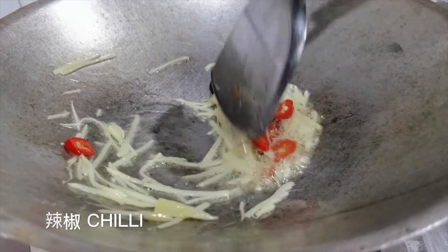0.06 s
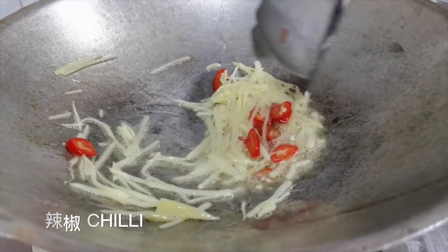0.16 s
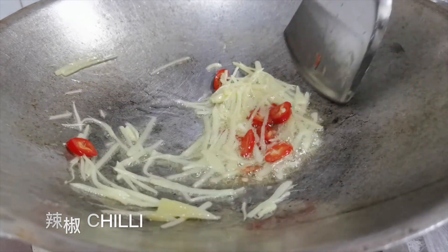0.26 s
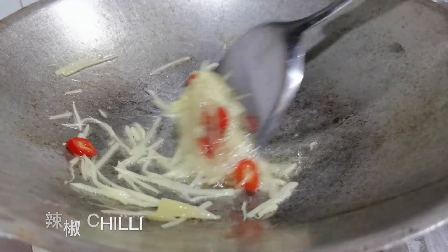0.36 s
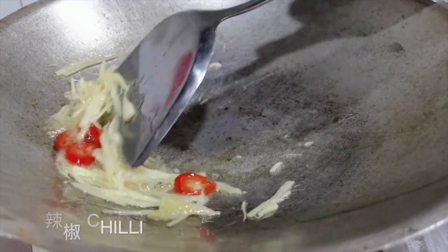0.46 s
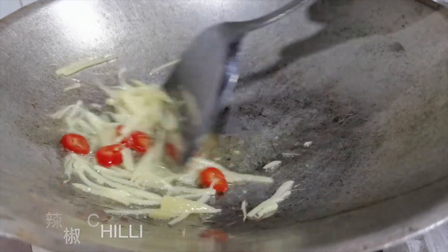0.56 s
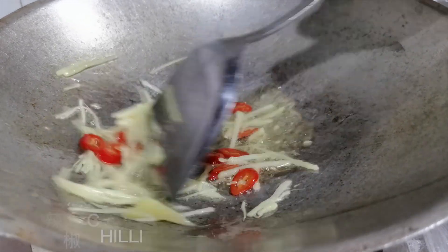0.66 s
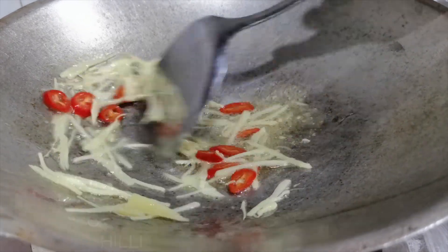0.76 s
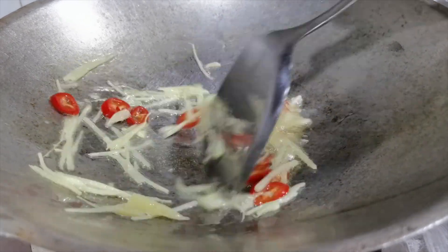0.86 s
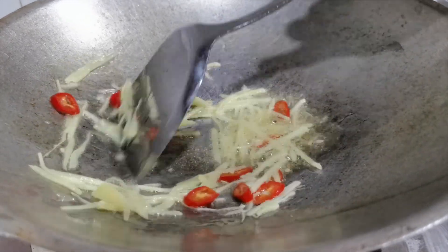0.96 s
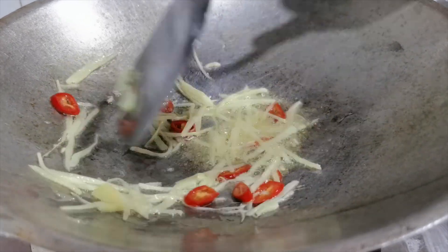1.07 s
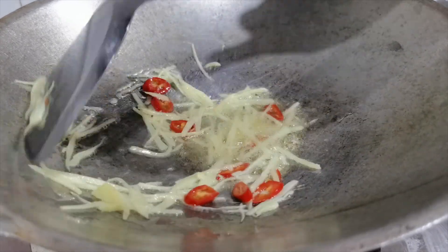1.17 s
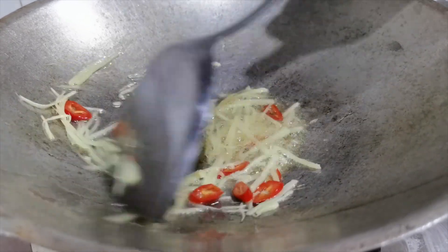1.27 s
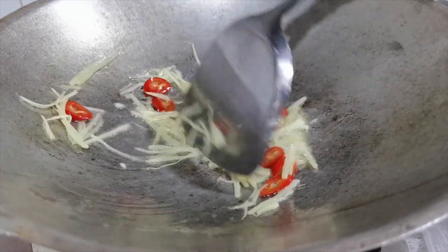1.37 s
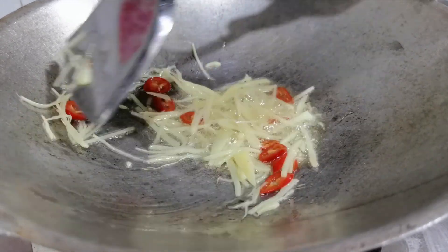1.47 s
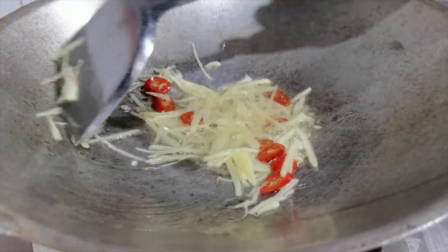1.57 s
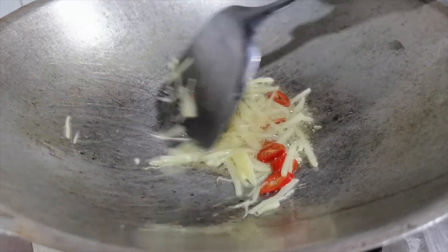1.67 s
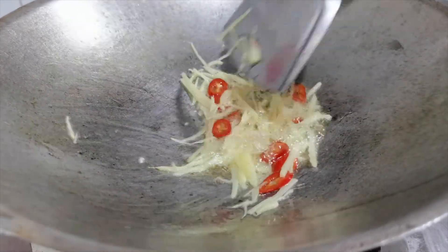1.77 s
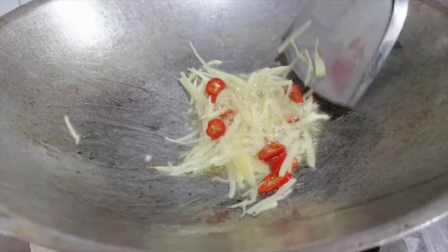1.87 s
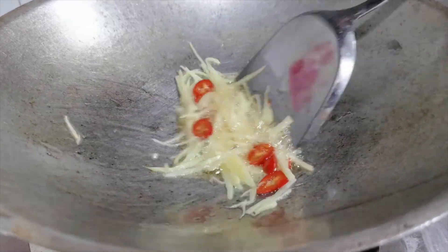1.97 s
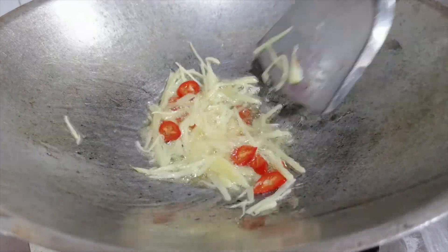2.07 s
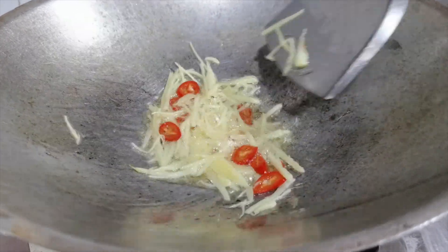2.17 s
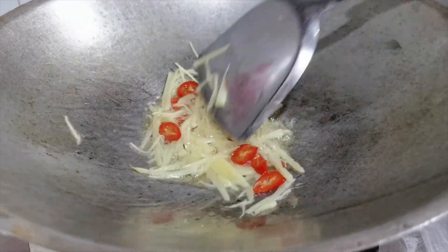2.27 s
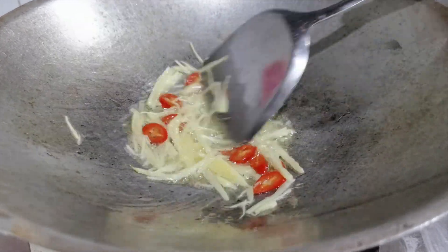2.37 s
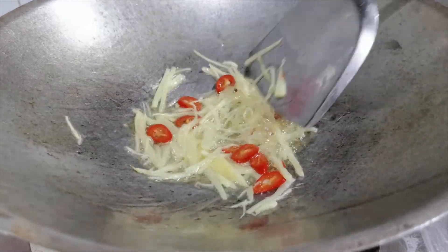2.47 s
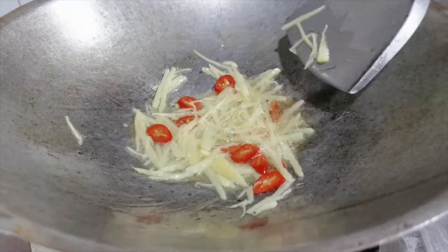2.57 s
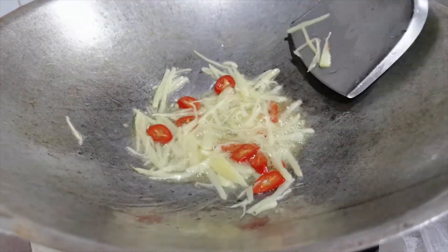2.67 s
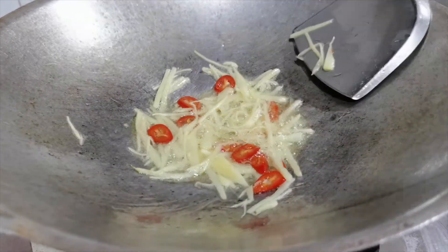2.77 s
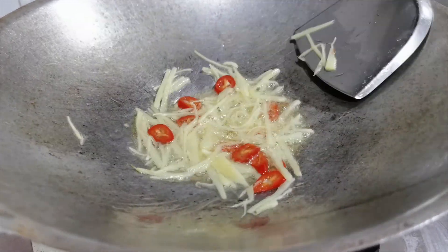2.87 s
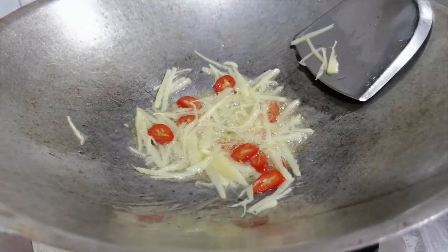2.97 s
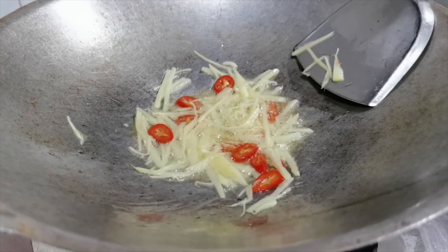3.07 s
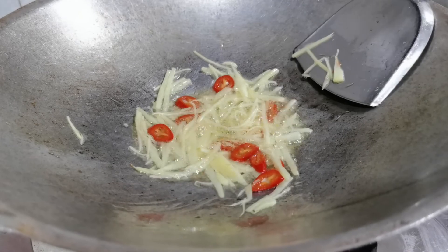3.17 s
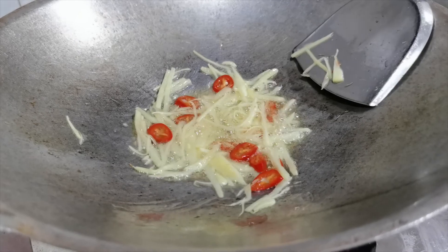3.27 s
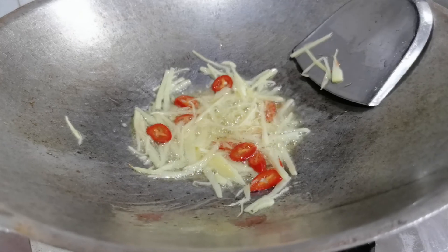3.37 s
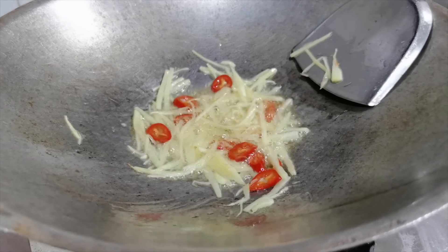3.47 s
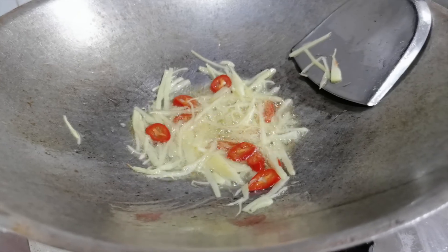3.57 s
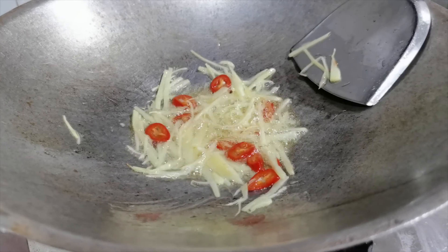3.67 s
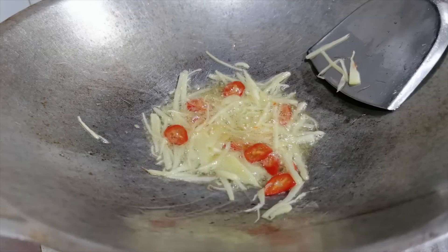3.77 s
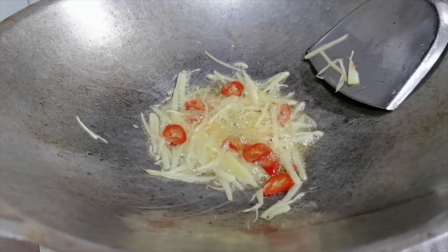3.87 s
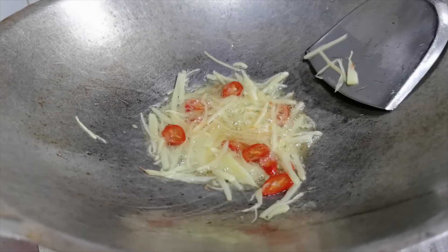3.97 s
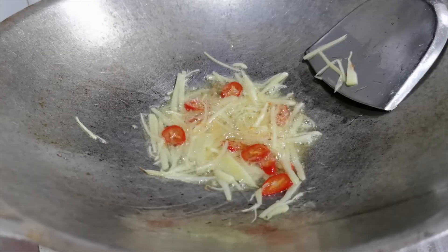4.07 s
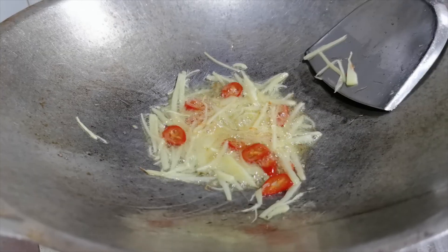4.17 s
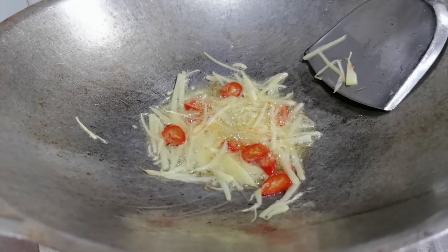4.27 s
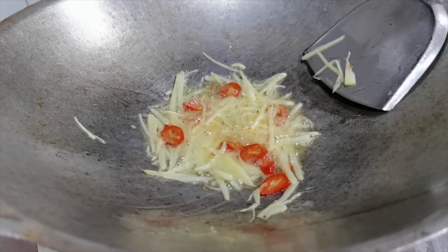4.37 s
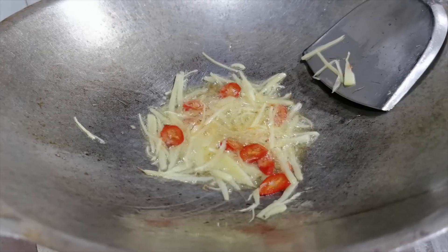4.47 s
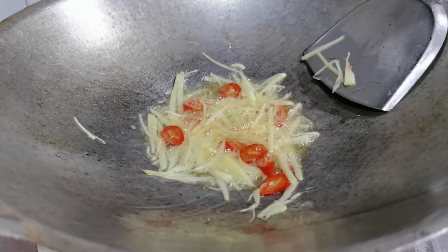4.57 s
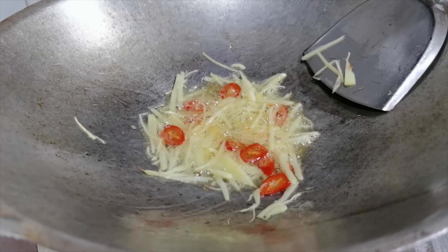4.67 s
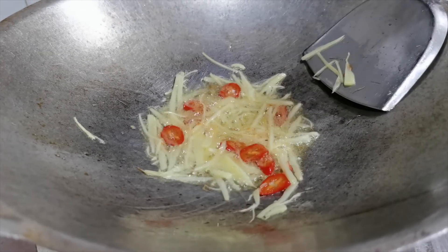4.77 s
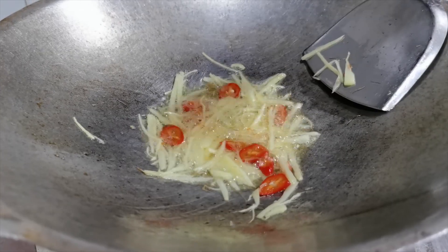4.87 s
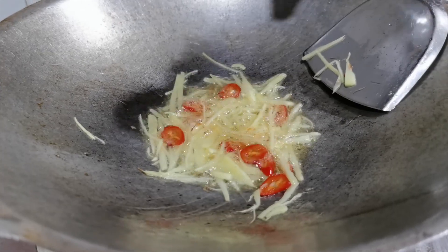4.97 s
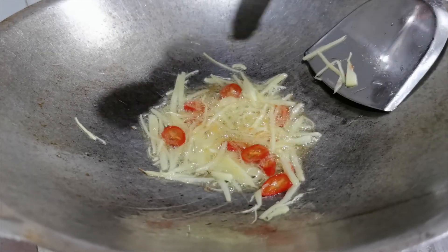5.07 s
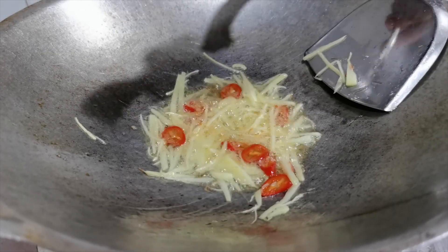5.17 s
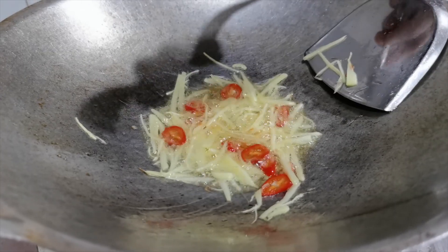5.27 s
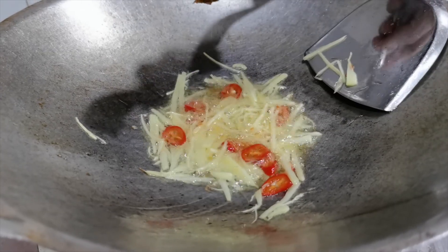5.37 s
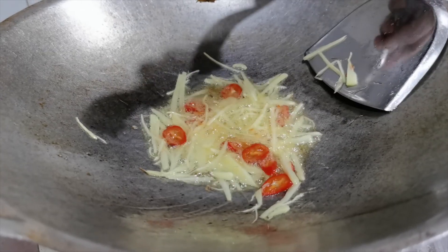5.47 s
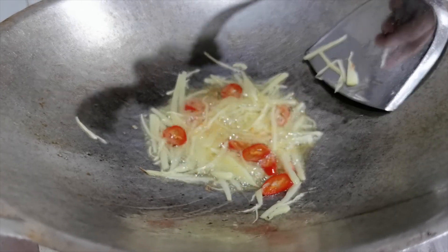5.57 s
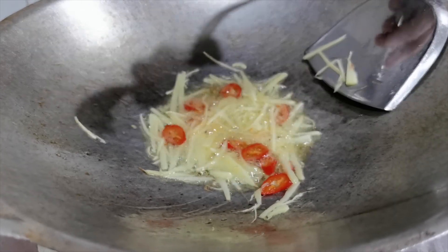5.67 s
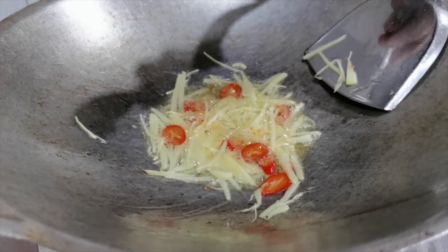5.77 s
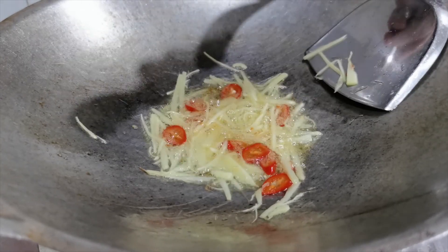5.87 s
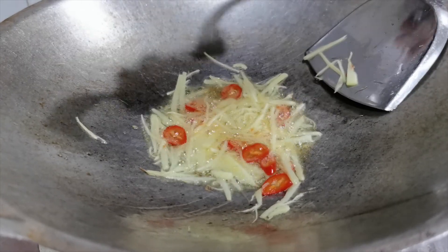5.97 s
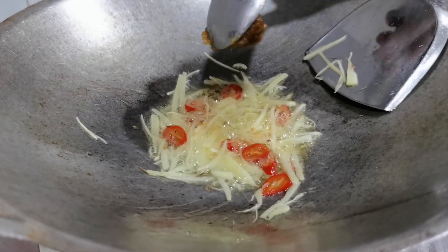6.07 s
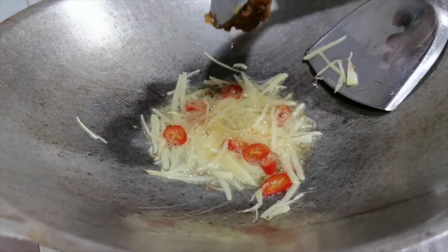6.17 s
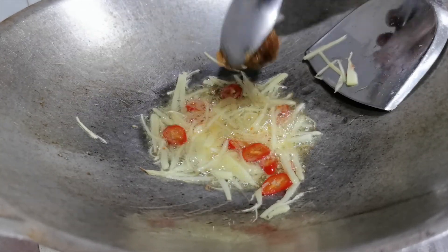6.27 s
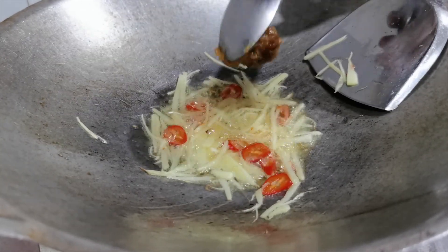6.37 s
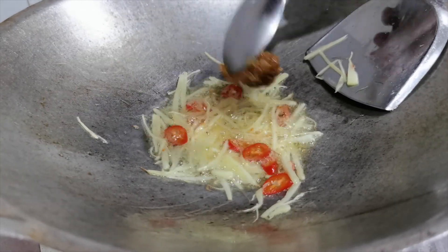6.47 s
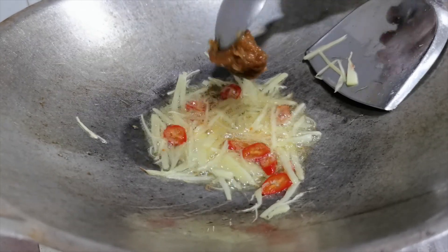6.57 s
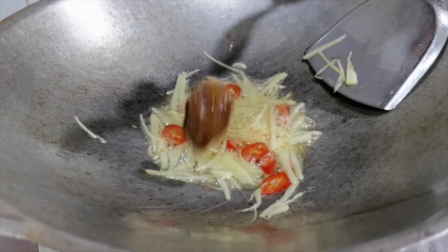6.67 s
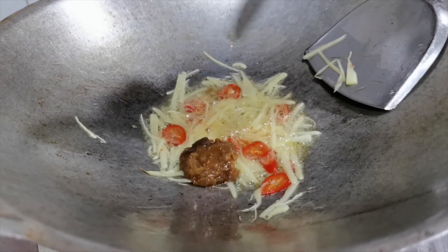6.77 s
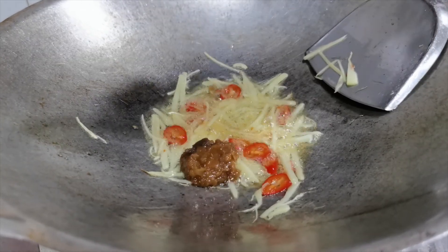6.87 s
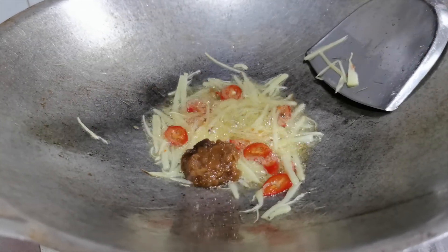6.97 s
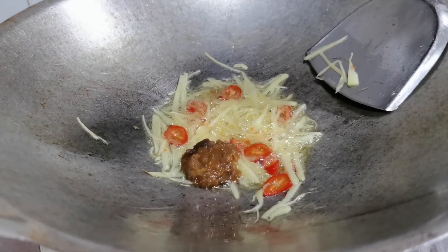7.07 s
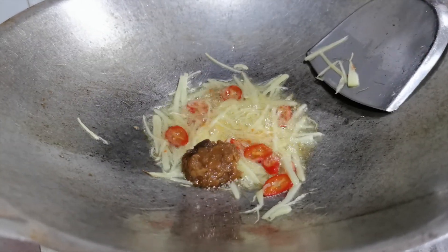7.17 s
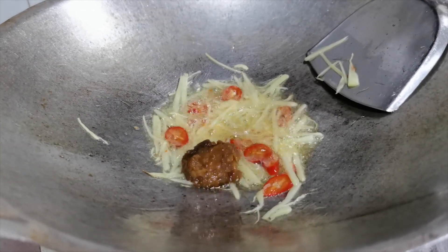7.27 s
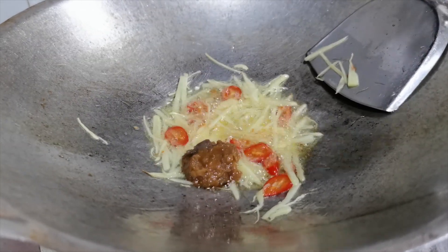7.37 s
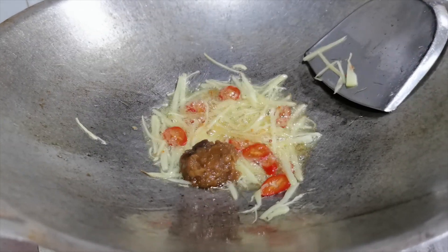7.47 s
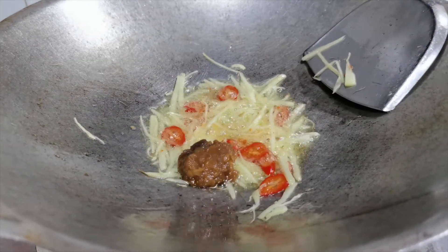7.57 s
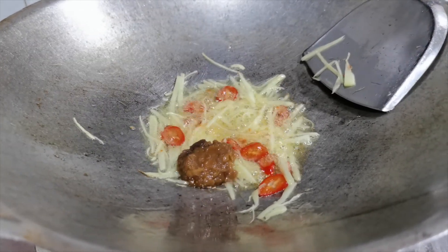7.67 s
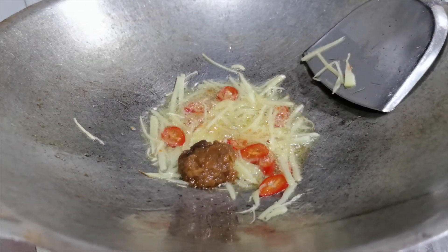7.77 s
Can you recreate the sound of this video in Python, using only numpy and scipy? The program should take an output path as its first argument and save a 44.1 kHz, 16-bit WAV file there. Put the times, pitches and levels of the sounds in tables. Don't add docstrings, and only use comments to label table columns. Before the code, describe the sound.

A metal spatula knocks and scrapes a frying wok, rattles to rest on its rim, then crackling oil flares under wet paste.

```python
import sys
import numpy as np
from scipy import signal
from scipy.fft import rfft, irfft
from scipy.io import wavfile
from scipy.ndimage import uniform_filter1d

SR = 44100
rng = np.random.default_rng(int(sys.argv[2]) if len(sys.argv) > 2 else 0)


def waveform_to_disk(signal):
    frames = np.transpose(np.atleast_2d(signal))
    scaled = np.clip(frames, -1, 1) * 32767
    samples = np.round(scaled).astype(np.int16)
    wavfile.write(sys.argv[1], SR, samples)


def nominal_scale(level):
    x = np.asarray(level, float) / 20
    return 10 ** x


N = 345303
T = np.arange(N) / SR
F = np.maximum(np.fft.rfftfreq(N + 1, 1 / SR), 1)

# time in seconds, fan beat in dB, flame roar in dB.
HOOD = [(0.0, -52, -45.5), (0.44, -60, -48.5), (1.26, -58, -47), (2.45, -66, -47), (2.52, -67, -39.5),
        (2.64, -66, -49), (3.38, -53, -43.5), (5.49, -56.5, -46), (6.24, -47, -43), (6.89, -47, -47.5),
        (7.83, -64, -44.5)]
# frequency in Hz, level in dB per Hz.
ROAR_COLOUR = [(15, -49), (25, -17), (59, -10.5), (91, -7), (123, 3), (195, -5), (267, -10), (295, -26),
               (318, -21.5), (384, -15), (500, -23.5), (650, -51), (1100, -120)]
# frequency in Hz, level in dB.
HUM = [(118.4, -52), (296.1, -62), (382.2, -68), (608.3, -74)]
# time in seconds, level in dB.
AIR = [(0, -56), (.9, -56), (1.18, -61.5), (1.3, -45), (2.3, -56.5), (3.8, -58), (3.86, -53), (6.6, -52.5),
       (7.83, -49.5)]
# frequency in Hz, level in dB per Hz.
DRAUGHT_COLOUR = [(290, -11), (500, -9), (534, -9.5), (590, -3), (765, -9), (916, -2), (2290, -7),
                  (2800, -6), (3640, -8), (6160, -120)]
# time in seconds, pitch in Hz, level in dB.
FLAME = [(0, 135, -50.5), (2.45, 135, -49), (2.72, 130, -57), (2.88, 134.9, -42), (3.0, 158, -40),
         (3.3, 150, -41.5), (3.62, 140, -41), (3.8, 134.6, -50), (7.83, 128, -49)]
FLAME_WANDER_PER_S, FLAME_DB = 14.0, -5.5

# time in seconds, hiss in dB.
FRY = [(0.0, -36), (1.2, -37.5), (3.0, -39.5), (4.8, -37), (6.0, -38.5), (7.83, -35.5)]
# frequency in Hz, level in dB per Hz.
FRY_COLOUR = [(1290, -24), (2200, -12.5), (2610, -18.5), (3030, -2), (3520, 1), (4280, 2), (5710, -1),
              (7130, -2.5), (9280, 0.5), (10300, 3), (15200, -3), (15700, 0)]
# frequency in Hz, level in dB per Hz.
BOIL_COLOUR = [(880, -49), (1500, -28), (1620, -16.5), (2720, -12.5), (3580, -3.5), (4390, -8), (5720, -1),
               (8710, -7.5), (10300, -2.5), (15500, -10.5)]
# frequency in Hz, width in Hz, level in dB.
DOME = [(5655, 100, 4), (5280, 170, 2), (6780, 130, -4)]
PASTE_S, FLARE_S, SETTLE_S = 6.685, .022, 0.33
PASTE_DB, FLARE_DB, SIMMER_DB_PER_S = -29.5, 3.5, 4
# frequency in Hz, width in octaves, extra share.
BOIL_SPOT = (4370, .09, .3)

# start in seconds, length in seconds, level in dB, pitch in Hz.
FIZZES = [(0.152, .032, -34, 5370), (1.608, 0.064, -35.5, 6200), (2.563, 0.03, -36.5, 7000),
          (3.924, .035, -39, 13500), (5.072, 0.089, -41, 11490), (5.862, .03, -42, 12000),
          (6.708, 0.055, -30.5, 11600)]
# time in seconds, peak in dB, pitch in Hz, left minus right in dB.
TICKS = [(0.0357, -18.5, 11800, -1.5), (0.928, -21, 5600, -0.5), (1.0182, -24, 3460, -1),
         (1.0896, -17.5, 6030, 0), (1.1335, -21, 9000, 0), (1.8183, -18, 10800, -3), (2.1505, -27, 8320, 3),
         (2.171, -20, 6890, -3), (2.2992, -21, 10200, 0.5), (2.542, -21.5, 5800, 0.0),
         (2.6716, -22, 9390, 2.0), (2.936, -18, 5830, 0.5), (2.9897, -16, 10000, 3), (3.261, -22, 10200, 7),
         (3.295, -26, 5710, 2), (3.4366, -25, 12100, -3), (3.493, -23, 10500, 4), (3.672, -15.5, 12700, -2),
         (3.69, -20, 10500, 1), (3.7082, -15, 8850, -2), (3.728, -20, 5530, -0.5), (3.834, -18, 12000, -2),
         (3.856, -19, 14600, -0.5), (3.8884, -17.5, 10400, 3), (3.9255, -21, 14900, -0.5),
         (4.042, -21, 11700, -0.5), (4.2589, -22, 10100, 0.5), (4.276, -22, 10800, 1.0),
         (4.3014, -22, 9920, 0.0), (4.3844, -26, 11000, -3.0), (4.392, -14, 11100, -0.5),
         (4.417, -20, 8410, 4), (4.5155, -21, 12100, -1.5), (4.609, -20, 12100, -0.5),
         (4.6488, -21, 10300, 1.0), (4.7024, -15, 9880, 1.5), (4.793, -20.5, 5900, 2),
         (4.8744, -17.5, 12400, -4), (4.9275, -18.5, 5900, 3), (5.0384, -19, 12900, -5),
         (5.0789, -23, 9900, 0.5), (5.2837, -22.5, 7560, -0.5), (5.3268, -18, 6820, 1),
         (5.3474, -30, 6580, -2.0), (5.4194, -26, 10100, -0.5), (5.4375, -22, 14400, -3),
         (5.476, -23, 7530, 0.5), (6.3405, -22, 9720, 2), (6.3875, -19.5, 10200, -0.5),
         (6.618, -20, 13200, -7), (6.697, -22, 10100, 1.5)]
# time in seconds, peak in dB, pitch in Hz,
# left minus right in dB.
MORE_TICKS = [(0.0697, -16, 10450, 3), (0.4872, -15, 9870, 1.0), (1.053, -17, 7890, 3),
              (2.3974, -23, 5610, 0.0), (2.4444, -21, 8860, -0.5), (4.157, -24, 12300, -0.5),
              (5.1034, -22, 10100, 0.0), (5.1154, -22, 14500, 0.0), (5.1344, -21, 10500, 0.0),
              (5.1894, -27, 5700, 0.0), (5.873, -25, 8420, -2), (5.9994, -29, 10500, 0.0),
              (6.0654, -23, 10700, 0.0), (6.1044, -29, 10700, -0.5), (6.2467, -25, 10100, 2),
              (6.2744, -28, 10800, 0.5)]
# time in seconds, peak in dB, pitch in Hz, left minus right in dB.
SPLASHES = [(7.337, -16, 9800, 1.0), (7.4935, -37, 5680, 0.5), (7.6917, -20, 10800, -0.5)]
TICK_T60_S, TICK_TAIL_T60_S, TICK_TAIL_DB = 0.0087, 0.048, -4.5
TICK_SHARPNESS, TICK_SNAP_DB = 1.84, 16
# time in seconds, peak in dB, pitch in Hz, left minus right in dB.
SPITS = [(0.446, -17, 9200, 1), (0.538, -20.5, 8750, -2), (1.253, -18.5, 8700, 1), (1.637, -14, 10600, -5),
         (2.1105, -22, 11000, -4), (2.634, -20.5, 11900, 3), (2.7703, -16, 6060, -2),
         (2.843, -18, 6200, -3), (3.092, -17, 6520, 0), (3.2274, -22, 5440, -1), (3.670, -19, 12700, -3.5),
         (3.691, -17.5, 9000, -5), (4.007, -23, 12200, -1), (4.211, -22, 12200, -5),
         (4.272, -18.5, 11000, -1), (4.38, -20.5, 11000, -1), (4.693, -18.5, 10200, 0),
         (4.927, -24, 7400, 3), (5.0937, -23, 10200, 1), (5.328, -11, 6800, -3), (5.538, -15, 5300, -2),
         (5.892, -16.5, 8250, -2), (5.972, -16, 7900, -2), (6.723, -19, 10700, 5), (7.337, -15, 8900, 1),
         (7.691, -18, 11000, -3)]
SMALL_COUNT, SMALL_DB, SMALL_SPREAD_DB = 70, -33, 0
SMALL_LOW_HZ, SMALL_OCTAVES, SMALL_PAN_DB = 4860, 1.43, 12
CLUSTER_HZ, CLUSTER_PER_S, CLUSTER_T60_S, CLUSTER_RISE_S = 8460, 260, 0.078, 0.0046

# frequency in Hz, width in Hz, level in dB.
BOWL = [(452, 177, -2.5), (560, 27, -2.5), (691, 51, -4)]
# frequency in Hz, width in Hz, level in dB.
HEEL = [(1104, 170, -14), (1070, 810, -4.5)]
# frequency in Hz, width in Hz, level in dB.
EDGE = [(1370, 40, 6.5), (1596, 120, 5.5), (1690, 150, 1.5), (2250, 1450, 8.5)]
# frequency in Hz, width in Hz, level in dB.
STEEL = [(5000, 50, -12), (5590, 570, 12), (6100, 290, 5), (6820, 1700, 5), (8670, 1100, 0.5),
         (10200, 440, 10), (11000, 430, 3.5), (12200, 530, 3.5), (13800, 400, 1)]
# start in seconds, length in seconds, level in dB.
SLIDES = [(2.736, 0.07, -42.5), (2.875, 0.324, -50.5)]
# frequency in Hz, width in Hz, level in dB.
SLIDE_MODES = [(1357, 25, -3), (1452, 23, 1), (1580, 27, -3), (2500, 37, -7.5)]
# start in seconds, length in seconds, bright grit in dB,
# weight on the bowl in dB, lean to the heel in dB.
STROKES = [(0.241, 0.012, -21, -35.5, -3), (0.285, 0.017, -18.5, -36, 6), (0.314, 0.052, -27, -40.5, 1.1),
           (0.735, .008, -26, -38, 12.5), (0.752, 0.062, -29.5, -47, 11), (0.781, 0.12, -34.5, -47.5, 2),
           (1.2027, 0.0056, -25, -31, 2), (1.235, 0.14, -43, -45, -2.5), (1.531, 0.012, -28, -27, 15),
           (1.562, 0.042, -36, -43, -1), (1.582, 0.05, -24, -48.5, 27), (1.63, 0.023, -30, -54, -10),
           (1.9137, 0.0055, -25, -33.5, 8), (1.95, 0.03, -31, -53, -8.5), (2.303, 0.019, -29.5, -51.5, -4),
           (2.345, 0.13, -37, -64.5, -11), (2.708, 0.029, -25, -36.5, -1.5), (2.758, 0.046, -47, -43, -2),
           (2.798, 0.015, -31, -45.5, -5.5), (2.873, 0.086, -48, -59, -6.5), (2.958, 0.054, -38, -44.5, 3),
           (3.021, 0.016, -33, -44.5, -3.5), (3.047, 0.14, -60, -47, -2), (3.16, 0.034, -40, -50.5, -2)]
# start in seconds, length in seconds, level in dB.
PUSHES = [(0.53, 0.026, -45.5), (1.203, .004, -38), (1.946, 0.042, -40.5), (2.308, 0.014, -47)]
# level offset in dB, share of the lean, release in dB per second.
LAYERS = [
    (-4.5, 0.37, 347),
    (-4.5, 0.29, 331),
    (-2.5, -1.48, 332),
    (-1, -0.097, 555),
]
STROKE_ATTACK_S, STROKE_SAG_DB_PER_S = 0.006, 45
# time in seconds, level in dB, brightness in dB.
RATTLE = [(2.7065, -25, 3), (2.733, -28.5, 5), (2.7905, -35, 6), (2.8067, -29, -1), (2.8776, -35, -7),
          (2.915, -43, -8), (2.9672, -35, -7), (2.991, -40, -6), (3.0205, -37, 2), (3.040, -34, 0),
          (3.1059, -38, -11), (3.1651, -32, -4), (3.181, -42.5, -3), (3.205, -43, -1)]
# frequency in Hz, level in dB, time to fade by 60 dB in seconds.
RIM_LOW = [(521, -12, 0.044), (1308, -10, 0.087), (1443, -10, 0.14), (1560, -8, 0.088)]
# frequency in Hz, level in dB, time to fade by 60 dB in seconds.
RIM_HIGH = [(2496, -6, 0.043), (2877, -6.5, 0.075), (3750, -6, 0.043), (4660, -5, .05)]
# time in seconds, level in dB,
# pitch in Hz, time to fade by 60 dB in seconds.
TWANGS = [(.7402, -30.5, 560, .12), (.7402, -24, 1150, 0.048), (0.7394, -36, 3020, 0.048),
          (.765, -36, 1186, .09), (.782, -37, 1220, 0.06), (0.826, -35.5, 1770, 0.072),
          (.902, -36, 1850, .015), (1.2062, -18.5, 740, 0.089), (1.585, -20, 1150, 0.082),
          (1.602, -20, 1256, .06), (1.633, -25, 1180, .05), (1.954, -33, 1620, 0.057),
          (1.537, -31, 785, 0.043), (1.622, -32, 1330, .04), (1.65, -26.5, 1120, .04),
          (1.965, -45, 640, .04), (1.2077, -22.5, 1070, 0.045), (1.21, -26.5, 424, 0.058),
          (1.985, -40, 870, .05)]
# time in seconds, peak in dB, thud in dB, blade ring in dB, left minus right in dB.
BLOWS = [(0.2393, -8, -29, -14, 1.5), (0.253, -4, -31, -41, -5), (0.7414, -18.5, -43, -33, 1),
         (1.2064, -6.5, -3.5, -20, -2), (1.536, -8, -10, -46, -2), (1.919, -3.5, -50, -45, 0.5),
         (1.953, -17.5, -46, -34, -10), (2.7042, -4, -33, -12, -1), (2.7242, -9.5, -50, -15.5, -5.5),
         (2.876, -33, -58, -35, -1), (2.9668, -27, -48, -35, -3), (3.023, -20.5, -54, -34, -4),
         (3.1662, -27, -52, -36.5, -2)]
# frequency in Hz, level in dB, time to fade by 60 dB in seconds.
BLADE = [(4755, 6.5, 0.09), (4816, 13, 0.049), (2755, 0, 0.029), (1530, 2, 0.03), (470, -13, 0.43),
         (7510, 3.5, .04), (10220, 8.5, 0.031), (6200, -12, 0.033)]
# time in seconds, level in dB, struck spot (column of SPOTS).
RINGS = [
    (.241, -4, 0),
    (.296, -3, 0),
    (1.208, -1, 1),
    (1.537, -1, 2),
]
# frequency in Hz, time to fade by 60 dB in seconds,
# left minus right in dB, left ahead of right in radians.
WOK = [(598, .5, 3, .2), (775, .4, 3, .2), (949.3, 1.3, 6, .3), (1301, .8, 12, 1.1), (1443, 2.9, 1.5, 0),
       (1566, .55, 5, -.5), (1797, 1.2, 6, -1.2), (1933, 1.5, 2.5, -.7), (2207, 1.2, 2.5, -.7),
       (2444, 1.3, -18, 1.3), (2768, 1.0, 0, 1.5), (2933, .75, -1.5, 1.6), (3303, .7, 1.5, -2.4),
       (3483, .8, 0, -1.5), (3753, .75, -4, .3), (4334, .5, 0, 0)]
# at the rim in dB, on the floor in dB, on the wall in dB.
SPOTS = [(-61, -41, -47), (-58, -47, -44), (-45.5, -29, -37.5), (-34.5, -23.5, -29.5), (-44, -38, -31),
         (-24, -20.5, -18), (-37, -27, -39), (-62, -38, -39), (-47, -34.5, -40), (-60, -41, -40.5),
         (-60, -34.5, -39), (-30, -28.5, -43), (-25, -23.5, -28.5), (-33, -40, -33), (-33, -41, -28.5),
         (-35, -37.5, -43)]
TOUCH_S, TOUCH_DB, QUIVER_DB = 1.92, -44, .8

# frequency in Hz, left minus
# right in dB, # right behind left in radians, share common to both.
PORTS = [(30, 1.5, 0, .97), (200, 2.5, 0, .95), (700, 1.5, -.2, .7), (1300, 0, .2, .45),
         (2200, 3, 1.0, .25), (3300, -1.5, .7, .4), (3900, -2.5, 2.2, .3), (4220, -.3, 3.1, .72),
         (4500, 0, 3.14, .76), (4850, 0, 3.1, .5), (5400, -.5, 3.0, .55), (5900, .6, .6, .45),
         (7000, -1.5, .1, .2), (9800, 5, .2, .15), (11300, 0, .5, .15), (12100, -7, .5, .1),
         (15000, -1.5, .5, .1)]
ROOM_T60_S, ROOM_DB = 0.27, -7
TOP_HZ = 15900


def curve(rows, column=1, off=-120):
    rows = np.array(rows)
    return np.interp(T, rows[:, 0], rows[:, column], off, off)


def along(points, column=1):
    points = np.array(points)
    return np.interp(np.log(F), np.log(points[:, 0]), points[:, column])


def filtered(x, gain):
    return irfft(rfft(x, N + 1) * gain, N + 1)[..., :N]


def colour(x, gain):
    y = filtered(x, gain)
    return y / np.sqrt(np.mean(y ** 2))


def peaks(table):
    return sum(nominal_scale(db) * 1j * F * w / (hz ** 2 - F ** 2 + 1j * F * w) for hz, w, db in table)


def steel(between_db):
    hollow = 1 - .6 * abs(peaks([(4000, 900, 0)]))
    return peaks(STEEL) + nominal_scale(between_db) * hollow * (1j * F / (1500 + 1j * F)) ** 2


def walk(rate):
    k = int(SR / rate)
    steps = np.repeat(rng.standard_normal(N // k + 1), k)
    return 1.454 * uniform_filter1d(uniform_filter1d(steps, k), k)[:N]


def grains(rate, spread_db):
    hit = rng.random(N) < rate / SR
    size_db = spread_db * np.minimum(rng.exponential(size=N), 3.0)
    return hit * rng.standard_normal(N) * nominal_scale(size_db)


def wide(a, b, spot=0):
    hz, octaves, share = BOIL_SPOT
    extra = spot * share * np.exp(-(np.log2(F / hz) / octaves) ** 2)
    like = np.clip(along(PORTS, column=3) + extra, 0, .98)
    mid = rfft(a, N + 1) * np.sqrt((1 + like) / 2)
    side = rfft(b, N + 1) * np.sqrt((1 - like) / 2)
    return irfft(np.array([mid + side, mid - side]), N + 1)[:, :len(a)]


def fade(t60, seconds):
    t = np.arange(int(seconds * SR)) / SR
    return t, np.exp(-np.log(1000) * t / max(t60, .003))


def add(out, s, sound, pan_db=0.):
    i = int(s * SR)
    n = min(sound.shape[-1], N - i)
    out[:, i:i + n] += sound[..., :n] * nominal_scale(np.array([[pan_db], [-pan_db]]) / 2)


def ring(modes, seconds, turn=1.5):
    out = 0
    for hz, db, t60 in modes:
        t, env = fade(t60, seconds)
        start = rng.uniform(-np.pi, np.pi)
        skew = turn * rng.uniform(-1.6, 1)
        out = out + nominal_scale(db) * env * np.sin(2 * np.pi * hz * t + start + np.array([[skew], [-skew]]) / 2)
    return out * np.minimum(t / 0.00087, 1)


def stroke(length, release, sag=STROKE_SAG_DB_PER_S):
    t = np.arange(int((length + .3) * SR)) / SR
    fall_db = -sag * t - release * np.maximum(t - length, 0)
    return np.minimum(t / STROKE_ATTACK_S, 1) ** 2 * nominal_scale(fall_db)


def band_pop(noise, hz, sharpness):
    size = signal.iirpeak(hz, sharpness, SR)
    return signal.lfilter(*size, signal.lfilter(*size, noise))


def hood():
    fan_hz = 65.5 + 1.52 * walk(2.5)
    out = np.sin(2 * np.pi * np.cumsum(fan_hz) / SR) * nominal_scale(curve(HOOD) + 1.0 + 0.98 * walk(13.0))
    for hz, db in HUM:
        level = nominal_scale(db - 1.0 + 2.2 * walk(6.9)) * np.sqrt(2)
        out = out + level * np.sin(2 * np.pi * hz * T + 0.82 * walk(9.0))
    return out


def draught():
    air = colour(wide(*rng.standard_normal((2, N))), nominal_scale(along(DRAUGHT_COLOUR)))
    return air * nominal_scale(curve(AIR) + 0.92 * walk(8.0))


def roar():
    hollows = 1 - 0.63 * abs(peaks([(65, 23, 0), (100.5, 29, 0)]))
    noise = wide(*rng.standard_normal((2, N)))
    return colour(noise, nominal_scale(along(ROAR_COLOUR)) * hollows) * nominal_scale(curve(HOOD, column=2) - 1.5)


def flame():
    turn = np.exp(2j * np.pi * np.cumsum(curve(FLAME)) / SR)
    tone = np.real(turn * (walk(FLAME_WANDER_PER_S) + 1j * walk(FLAME_WANDER_PER_S)))
    return tone / tone.std() * nominal_scale(curve(FLAME, column=2) + FLAME_DB)


def sizzle(points, rate, spread_db, grain_db, flicker_db, spot=0):
    burst = np.exp(-np.arange(300) / 35.0)
    gate = signal.fftconvolve(np.abs(grains(rate, spread_db)), burst)[:N]
    gate = 1 + nominal_scale(grain_db) * gate / np.sqrt(np.mean(gate ** 2))
    out, swell = 0, walk(9.0)
    for hz in 1000 * 2 ** np.arange(0, 4.6, .5):
        band = np.exp(-(np.log2(F / hz) / .35) ** 2)
        own = signal.fftconvolve(np.abs(grains(rate / 4, spread_db)), burst)[:N]
        bubbles = gate + nominal_scale(grain_db) * own / own.std()
        flutter = bubbles * nominal_scale(flicker_db * (swell + walk(25.0)))
        noise = wide(*(rng.standard_normal((2, N)) * flutter), spot)
        out = out + rfft(noise, N + 1) * band
    return colour(irfft(out, N + 1), nominal_scale(along(points)) * (1 + abs(peaks(DOME))))


def paste():
    t = np.maximum(T - PASTE_S, 0)
    level_db = PASTE_DB + FLARE_DB * np.exp(-t / SETTLE_S) - SIMMER_DB_PER_S * t
    return (1 - np.exp(-t / FLARE_S)) ** 2 * nominal_scale(level_db)


def fizz():
    out = np.zeros((2, N))
    for s, length, db, hz in FIZZES:
        n = int(length * SR)
        grit = nominal_scale(3.0 * np.repeat(rng.standard_normal(200), 60)[:n])
        noise = rng.standard_normal(6000) + rng.standard_normal((2, 6000))
        puff = band_pop(noise[:, :n] * grit * np.hanning(n) ** .5, hz, 1.7)
        add(out, s, nominal_scale(db) * puff / puff.std())
    return out


def ticks():
    out = np.zeros((2, N))
    for s, db, hz, pan_db in TICKS + MORE_TICKS + SPLASHES:
        env = fade(TICK_T60_S, .05)[1] + nominal_scale(TICK_TAIL_DB) * fade(TICK_TAIL_T60_S, .05)[1]
        noise = (rng.standard_normal(len(env)) + 2.5 * rng.standard_normal((2, len(env)))) * env
        noise[:, 0] = nominal_scale(TICK_SNAP_DB)
        pop = band_pop(noise, min(hz, 15500), TICK_SHARPNESS)
        add(out, s, nominal_scale(db - 1.5) * pop / np.abs(pop).max(), pan_db)
    return out


def spits():
    out = np.zeros((2, N))
    when, strength, pitch, side = rng.random((SMALL_COUNT, 4)).T
    small_db = SMALL_DB + SMALL_SPREAD_DB * strength
    small_hz = SMALL_LOW_HZ * 2 ** (SMALL_OCTAVES * pitch)
    small = np.c_[when * T[-1], small_db, small_hz, SMALL_PAN_DB * (2 * side - 1)]
    for s, db, hz, pan_db in SPITS + small.tolist():
        t, tail = fade(CLUSTER_T60_S, .09)
        crowd = 1 / (1 + (CLUSTER_HZ / hz) ** 6.0)
        hits = (rng.random(len(t)) < CLUSTER_PER_S / SR) * (.5 + rng.random(len(t)))
        after = np.convolve(hits, fade(0.0025, .01)[1])[:len(t)]
        first = (1 - 1.05 * crowd) * fade(.035 - 0.02 * crowd, .09)[1]
        rise = np.minimum(1 - 0.77 * crowd + t / CLUSTER_RISE_S, 1)
        env = first + (0.54 * tail + 0.68 * crowd * after) * rise * tail
        noise = (0.27 * rng.standard_normal(len(t)) + rng.standard_normal((2, len(t)))) * env
        pop = band_pop(noise, min(hz, 15500), 2.9 - 1.0 * crowd)
        pop = pop + 0.015 * np.diff(noise, 2, prepend=0, append=0)
        add(out, s, nominal_scale(db + 1.5) * pop / np.abs(pop).max(), pan_db)
    return out


def slide():
    press = np.zeros((2, N))
    for s, length, db in SLIDES:
        add(press, s, nominal_scale(db) * stroke(length, 400.0, sag=5.0))
    slips = wide(grains(2500, 2.3), grains(2500, 2.3)) * press * nominal_scale(2.2 * walk(40.0))
    response = peaks(SLIDE_MODES)
    unit = np.sqrt(np.mean(abs(response) ** 2) * 2500 / SR)
    return filtered(slips, response / unit)


def rattle():
    out = np.zeros((2, N))
    for s, db, bright_db in RATTLE:
        modes = RIM_LOW + [(hz, d + bright_db, t60) for hz, d, t60 in RIM_HIGH]
        luck = rng.standard_normal((len(modes), 2))
        modes = [(hz * (1 + 0.0085 * a), d + 2.2 * b, t60) for (hz, d, t60), (a, b) in zip(modes, luck)]
        add(out, s, nominal_scale(db) * ring(modes, .25, turn=0.73))
    for s, db, hz, t60 in TWANGS:
        add(out, s, ring([(hz, db, t60), (hz * 1.045, db - 5.5, t60)], .25, turn=0.51))
    return out


def scrape():
    out = 0
    bowl, heel, edge = (peaks(table) ** 2 for table in (BOWL, HEEL, EDGE))
    grit = steel(-10.0) * F / (F + 3000)
    for gain, (offset_db, share, release) in zip((bowl, heel, edge, grit), LAYERS):
        slips = colour(wide(grains(2500, 2.3), grains(2500, 2.3)), gain)
        press = np.zeros((2, N))
        for s, length, grit_db, weight_db, lean_db in STROKES:
            db = grit_db if gain is grit else weight_db
            add(press, s, nominal_scale(db + offset_db + share * lean_db) * stroke(length, release))
        if gain is bowl:
            for s, length, db in PUSHES:
                add(press, s, nominal_scale(db) * stroke(length, release))
        out = out + slips * press * nominal_scale(1.02 * walk(70.0))
    return out


def blows():
    out, crack, thud = np.zeros((3, 2, N))
    for s, db, thud_db, blade_db, pan_db in BLOWS:
        t, env = fade(0.038, .2)
        noise = rng.standard_normal(len(t)) + 1.19 * rng.standard_normal((2, len(t)))
        add(crack, s, nominal_scale(db - 15.5) * noise * (env + 0.32 * env ** 6), pan_db)
        add(out, s, ring(BLADE, 0.17) * nominal_scale(blade_db - 10.0), pan_db)
        add(thud, s, nominal_scale(thud_db + 0.5) * (1.22 * noise[0] + 0.29 * noise) * env ** 3, pan_db)
    return out + filtered(crack, steel(-5.0)) + filtered(thud, peaks(BOWL + HEEL))


def wok():
    out, quiver = np.zeros((2, N)), walk(30.0)
    ends = [row[0] for row in RINGS[1:]] + [RINGS[-1][0] + 2.0]
    for (s, blow_db, spot), end in zip(RINGS, ends):
        for (hz, t60, pan_db, lead), levels in zip(WOK, SPOTS):
            t, env = fade(t60, end - s + 0.0036)
            env = 0.9 * env + 0.037 * env ** 10.0
            env = env * np.minimum(np.minimum(t / 0.0045, (t[-1] - t) / 0.0034), 1)
            env = env * (1 + .15 * np.sin(2 * np.pi * (rng.uniform(2.5, 7) * t + rng.random())))
            shake_db = QUIVER_DB * np.roll(quiver, rng.integers(N))[:len(t)]
            touch_db = TOUCH_DB / t60 ** 2 * np.clip((s + t - TOUCH_S) / .01, 0, 1)
            env = env * nominal_scale(shake_db + touch_db)
            wave = np.sin(2 * np.pi * (hz * t + rng.random()) + np.array([[lead], [-lead]]) / 2)
            add(out, s, nominal_scale(levels[spot] + blow_db) * env * wave, pan_db)
    return out


def room(near):
    t, env = fade(ROOM_T60_S, .4)
    echo = rng.standard_normal((2, len(t))) * env * (t > .003)
    echo = echo / np.sqrt(np.sum(echo ** 2) / 2)
    return nominal_scale(ROOM_DB) * signal.fftconvolve(near, echo, axes=1)[:, :N]


def ports(x):
    tilt = nominal_scale(along(PORTS) / 2) * np.exp(.5j * along(PORTS, column=2))
    return filtered(x, np.array([tilt, 1 / tilt]))


def scene():
    kitchen = hood() + draught() + roar() + flame()
    oil = sizzle(FRY_COLOUR, 500, 4.7, -12.5, 0.96) * nominal_scale(curve(FRY) + 1.0)
    boil = sizzle(BOIL_COLOUR, 1200, 4.5, -13.0, 0.92, spot=0.67) * paste()
    droplets = fizz() + ticks() + spits()
    spatula = slide() + rattle() + scrape() + blows()
    near = droplets + spatula
    return ports(kitchen + oil + boil + near + room(near)) + wok()


def low_pass(x):
    return signal.sosfilt(signal.butter(12, 16960, fs=SR, output="sos"), x)


def record(dry):
    rounded = .95 * np.tanh(dry / .95)
    mix = filtered(rounded, np.where(F < TOP_HZ, 1, nominal_scale(-55)))
    return low_pass(mix)


dry = scene()
out = record(dry)
waveform_to_disk(out)
```